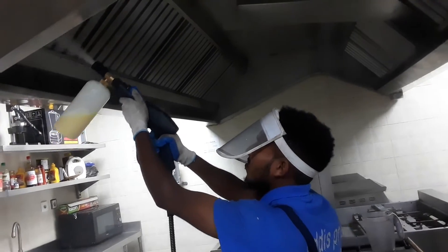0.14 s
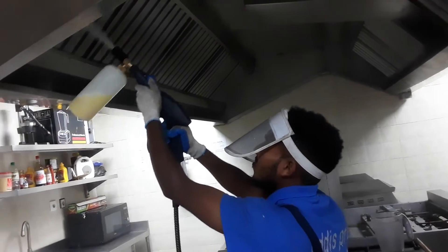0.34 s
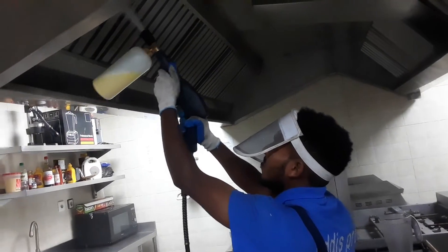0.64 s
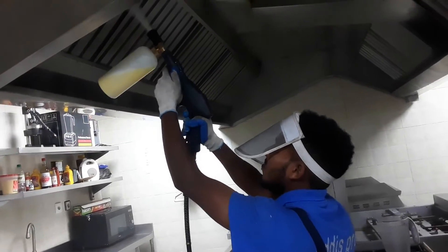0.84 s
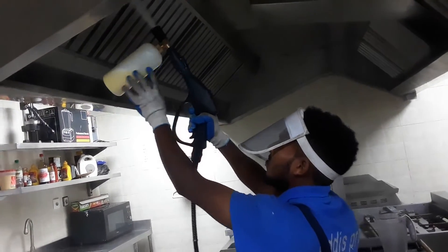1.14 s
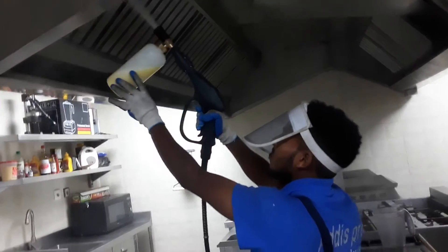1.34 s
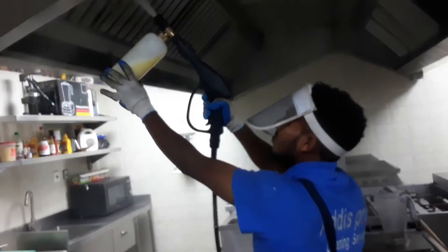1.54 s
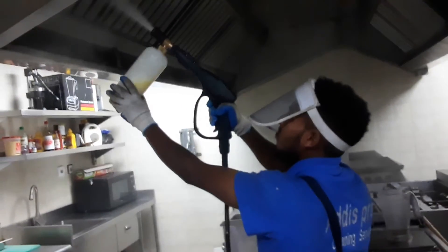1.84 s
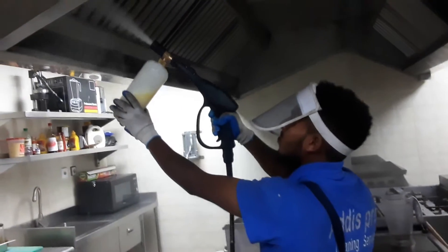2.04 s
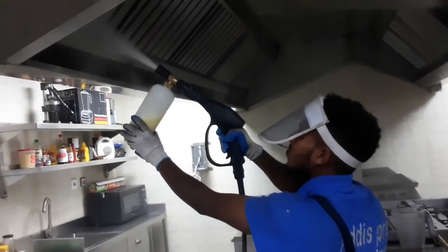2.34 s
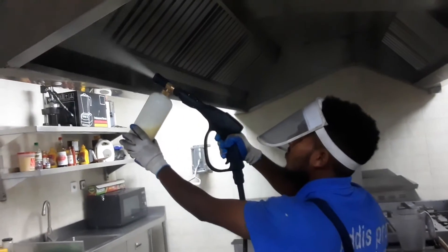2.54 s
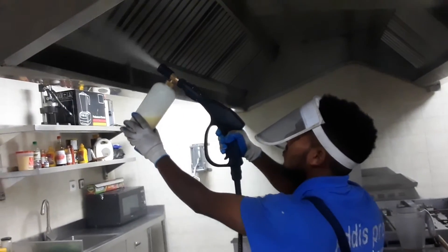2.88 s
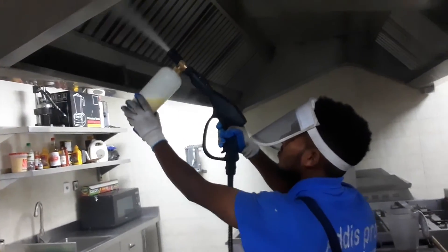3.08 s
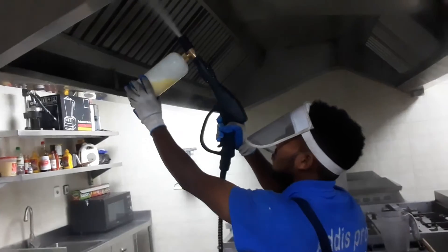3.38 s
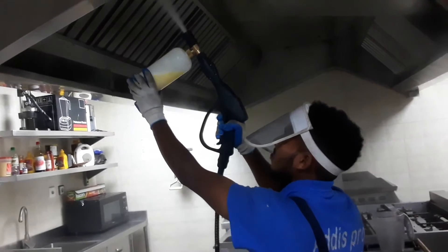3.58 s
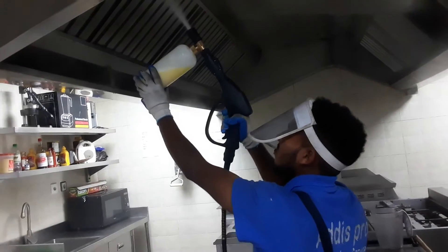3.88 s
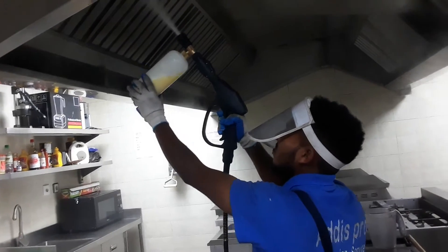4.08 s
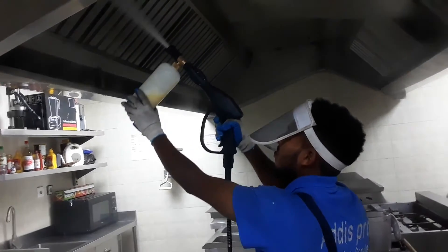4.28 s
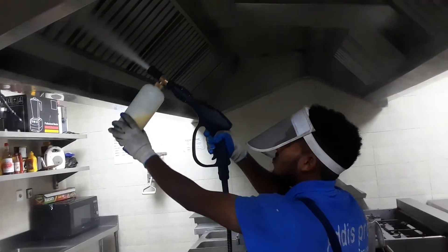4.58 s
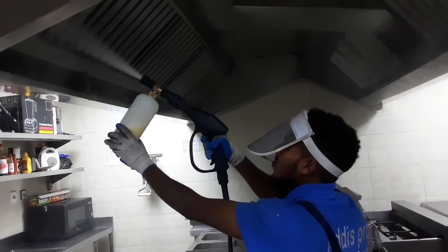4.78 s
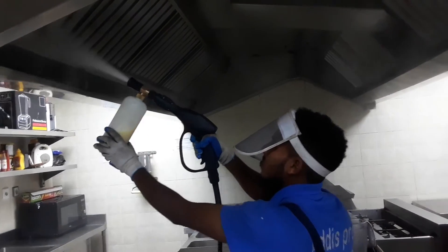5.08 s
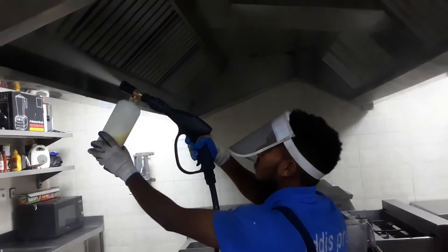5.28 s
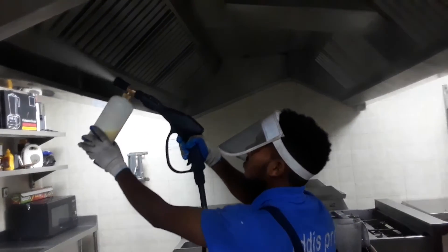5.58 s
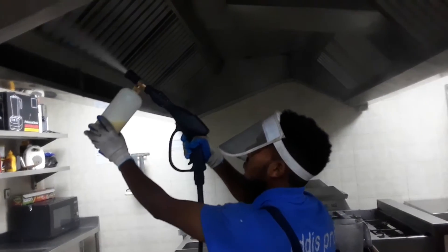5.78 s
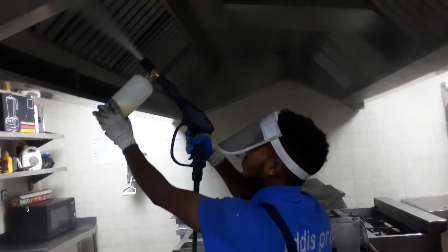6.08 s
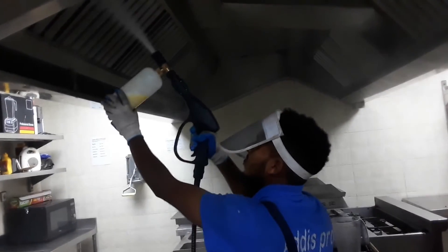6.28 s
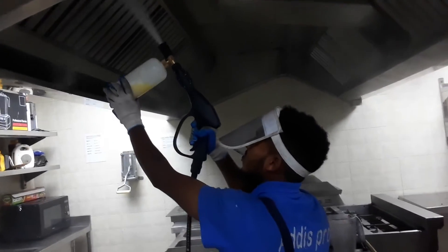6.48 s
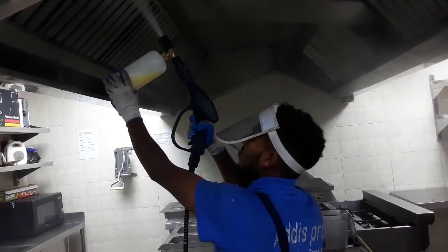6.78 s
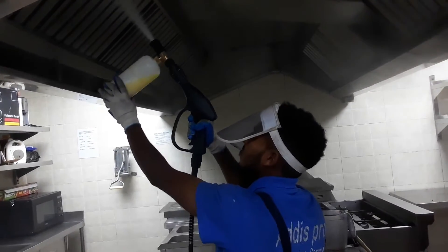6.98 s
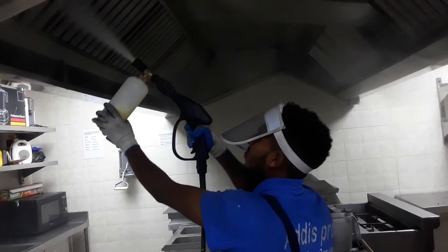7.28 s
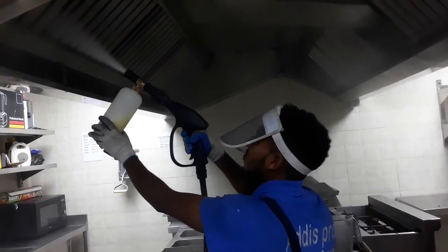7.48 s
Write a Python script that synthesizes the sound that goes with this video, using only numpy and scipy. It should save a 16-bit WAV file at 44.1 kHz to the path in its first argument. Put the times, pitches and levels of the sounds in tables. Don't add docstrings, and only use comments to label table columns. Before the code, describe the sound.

Close, essentially mono pickup of one unbroken steam spray, harsh and airy with a nasal, whistly colour but no clear pitch. Short metallic and tile reflections thicken it. It starts near and full, eases around three to four seconds, swells near five, thins around six, then recovers. Mist pops cluster before three seconds and near the end; fan rumble, a dull far knock and slight thin-steel ticks sit far below.

```python
import sys
import numpy as np
from scipy import signal
from scipy.fft import rfft, irfft, next_fast_len
from scipy.io import wavfile
from scipy.ndimage import uniform_filter1d

SR = 44100
rng = np.random.default_rng(int(sys.argv[2]) if len(sys.argv) > 2 else 0)


def pcm_store(signal):
    levels = np.round(np.clip(np.atleast_2d(signal), -1, 1) * 32767)
    wavfile.write(sys.argv[1], SR, levels.astype(np.int16).T)


def natural_amplitude(level_db):
    exponent = np.asarray(level_db, float) / 20
    return 10 ** exponent


N = 336483

# pitch in Hz, level in dB per Hz.
JET_SPECTRUM = [(310, -105), (520, -35.5), (721, -20), (1060, -24), (1410, -15), (1580, -18.5), (2070, -6),
                (2350, -4), (2750, -5), (3260, -9), (4270, -9.5), (6640, -1.5), (8220, -19.5), (11100, -19),
                (15600, -18)]
# centre in Hz, width in Hz, lift in dB.
PANEL_RESONANCES = [(660, 54, -0.5), (938, 110, 3.5), (1404, 134, 4), (2740, 100, 0.5), (3244, 430, -4.5),
                    (5950, 450, 2.5), (6900, 1200, 2.5), (7730, 280, -4.5)]
RANGE_EDGES_HZ = [1080, 1700, 2450, 3200, 5300, 7700, 12000]
# time in seconds, nearness to the microphone in dB,
# jet laid flat along the slats in dB, drier steam in dB.
GUN_AIM = [(0, 3.5, -2.3, .5), (.5, 2.7, -2.1, -1.4), (1.0, 2.5, -0.4, -.4), (1.4, 1.5, -1, -1.5),
           (1.9, 2.5, -1, 4.2), (2.3, 1.5, 1.5, 1), (2.8, 2, 3, 1), (3.2, -2, 1.5, 1.3),
           (3.7, -4, -0.2, -0.2), (4.1, -5, -1, 1.7), (4.65, -2, 1.5, -2.5), (4.9, 1.5, 0.3, 0),
           (5.5, 2.3, 2.2, -2.5), (5.9, -3.5, -1.3, 1.3), (6.45, -2, 0.2, -3), (6.8, -3, 0.1, -0.5),
           (7.1, -1, 1.4, -3.5), (7.63, 2, 0.5, -2.5)]
# level in dB, then dB of change per dB of nearness,
# of flat aim and of dryness.
JET_RANGES = [
    (-39.5, 0.34, -0.061, 0.17),
    (-33, 0.71, -0.66, .33),
    (-20.5, .04, -0.17, 0.76),
    (-21, .16, -0.077, -0.37),
    (-29, 0.31, 0.16, 0.34),
    (-21, .33, 0.92, 0.21),
    (-31, 0.74, -0.13, -0.07),
    (-29.5, .3, -0.02, -.64),
]
# pitch in Hz, level in dB per Hz.
RUMBLE_SPECTRUM = [(18, -50), (30, -18), (97, -2.5), (204, -1), (453, -2), (509, 1.5), (650, -14),
                   (840, -31), (1430, -120)]
# middle in seconds, low edge in Hz, high edge in Hz, level in dB.
SIDE_FLECKS = [
    (.118, 6800, 8300, -30),
    (.141, 14500, 15750, -40),
    (.164, 6300, 7600, -24),
    (.884, 11700, 13100, -39),
    (1.209, 14500, 15750, -44),
    (2.881, 13100, 14500, -41),
    (2.881, 6900, 8200, -29),
    (3.09, 13100, 14500, -42),
    (3.601, 9000, 10400, -43),
]
# start in seconds, peak in dB, sharpness in Hz.
MIST_PUFFS = [(0.632, -35, 250), (1.026, -34, 250), (2.280, -24.5, 250), (2.305, -34, 350), (2.4, -38, 250),
              (2.477, -35, 300), (2.632, -30, 350), (2.681, -29, 350), (2.781, -21.5, 350),
              (2.819, -32, 350), (2.988, -34, 300), (3.025, -36, 200), (3.061, -32, 250), (4.293, -32, 250),
              (4.322, -34, 250), (4.616, -35, 300), (4.892, -32, 300), (4.969, -28.5, 350),
              (5.169, -28, 300), (5.256, -39, 400), (5.2683, -13.5, 420), (5.446, -36, 400),
              (6.966, -39, 250), (7.328, -33, 200), (7.377, -37, 250), (7.394, -32, 250), (7.445, -28, 250),
              (7.502, -34, 250), (7.525, -29, 220)]
# start in seconds, peak in dB, length in seconds.
KNOCK_CONTACTS = [
    (3.188, -41, 0.033),
    (3.25, -47, 0.092),
]
# pitch in Hz, level in dB, time to fall 60 dB in seconds.
KNOCK_MODES = [(133, -6.5, .3), (200, -5, 0.34), (314, -2, .15), (350, -4, 0.13), (447, -1, .12),
               (610, 0, 0.044)]
# start in seconds, peak in dB, length in seconds.
RATTLE_CONTACTS = [
    (4.765, -41, 0.011),
    (5.405, -41., 0.013),
    (5.43, -35, 0.018),
]
# pitch in Hz, level in dB, time to fall 60 dB in seconds.
PANEL_MODES = [(445, -8, .06), (620, 2, 0.054), (873, 5, .09)]

JET_POSE_S, MIST_POSE_S = 0.3, 0.09
HOOD_T60_S, HOOD_DB = 0.19, -0.5
SLAT_T60_S, SLAT_DB = 0.0092, 0
WANDER_DB, WANDER_PER_S = 0.63, 2.2
RUMBLE_DB, RUMBLE_SHARE = -48.5, 0.2
DENT_S, SPIT_DB = 0.0012, -7
REBOUND_HZ, REBOUND_T60_S, REBOUND_DB = 66, 0.048, 5
MIC_CUT_HZ = 27
CONTROL_SHARE, CONTROL_DB = 0.23, -11


def rms_one(x):
    return x / np.sqrt(np.mean(x ** 2) + 1e-20)


def in_time(rows):
    s, *columns = np.transpose(rows)
    return [np.interp(np.arange(N) / SR, s, column) for column in columns]


def low_part(x, cut_hz):
    return signal.sosfiltfilt(signal.butter(4, cut_hz, fs=SR, output="sos"), x)


def coloured(x, points, lifts=()):
    size = next_fast_len(N)
    hz = np.maximum(np.arange(size // 2 + 1) * SR / size, 1)
    points_hz, points_db = np.transpose(points)
    level_db = np.interp(np.log(hz), np.log(points_hz), points_db)
    for centre_hz, width_hz, lift_db in lifts:
        level_db = level_db + lift_db / (1 + (2 * (hz - centre_hz) / width_hz) ** 2)
    return irfft(rfft(x, size) * natural_amplitude(level_db), size)[:N]


def drift(rate_hz):
    r = np.exp(-80 * np.pi * rate_hz / SR)
    noise = rng.standard_normal(N // 40 + 2002)
    slow = signal.lfilter([1], [1, -2 * r, r * r], noise)[2000:]
    return np.interp(np.arange(N) / 40, np.arange(len(slow)), rms_one(slow))


def hood(x, pose_s):
    length = 8192
    pose = np.arange(N) / SR / pose_s
    age = np.arange(length) / SR
    fall = natural_amplitude(-60 * age / HOOD_T60_S) + natural_amplitude(SLAT_DB - 60 * age / SLAT_T60_S)
    patterns = rng.standard_normal((120, length)) * fall / np.sqrt(np.sum(fall ** 2))
    padded = np.concatenate([rng.standard_normal(length), x])
    out = x.copy()
    for k in range(int(pose[-1]) + 2):
        a, b = np.searchsorted(pose, [k - 1, k + 1])
        echo = signal.fftconvolve(padded[a + 1:b + length], patterns[k % len(patterns)], "valid")
        fade = np.cos(np.pi / 2 * (pose[a:b] - k))
        out[a:b] += natural_amplitude(HOOD_DB) * echo * fade
    return out


def jet():
    near_db, flat_db, dry_db = in_time(GUN_AIM)
    steam = hood(rng.standard_normal(N), JET_POSE_S)
    mist = hood(rng.standard_normal(N), MIST_POSE_S)
    rest = coloured(mist + low_part(steam - mist, 8620), JET_SPECTRUM, PANEL_RESONANCES)
    flutter = drift(25)
    core_db = -0.13 * flutter
    spray_db = 0.63 * flutter + 0.34 * drift(5.3)
    fine_db = 0.56 * flutter + 0.63 * drift(25)
    finest_db = 0.4 * flutter + 1.1 * drift(25)
    flickers = [0.56 * drift(9), 0.7 * drift(11), core_db, core_db, spray_db, spray_db, fine_db, finest_db]
    out = 0
    for cut_hz, row, flicker_db in zip(list(RANGE_EDGES_HZ) + [None], JET_RANGES, flickers):
        mean_db, near, flat, dryness = row
        part = rest if cut_hz is None else low_part(rest, cut_hz)
        rest = rest - part
        part = part / np.sqrt(uniform_filter1d(part ** 2, size=8820) + 1e-20)
        held_db = near * near_db + flat * flat_db + dryness * dry_db
        wander_db = WANDER_DB * drift(WANDER_PER_S)
        out = out + part * natural_amplitude(mean_db + held_db + wander_db + flicker_db)
    return out


def rumble():
    near_db = in_time(GUN_AIM)[0]
    air = rms_one(coloured(rng.standard_normal(N), RUMBLE_SPECTRUM))
    return air * natural_amplitude(RUMBLE_DB + RUMBLE_SHARE * near_db + 1.3 * drift(12))


def side_flecks():
    out = np.zeros(N)
    swell = np.sin(np.pi * np.arange(2048) / 2048) ** 2
    for s, low_hz, high_hz, side_db in SIDE_FLECKS:
        band = signal.butter(6, [low_hz, high_hz], "band", fs=SR, output="sos")
        fleck = signal.sosfiltfilt(band, rng.standard_normal(2048))
        at = round(s * SR) - 1024
        out[at:at + 2048] += natural_amplitude(side_db) * rms_one(fleck) * swell
    return out * [[1], [-1]]


def puffs():
    out, t = np.zeros(N), np.arange(4000) / SR
    late = t - DENT_S
    rebound = natural_amplitude(REBOUND_DB - 60 * late / REBOUND_T60_S) * np.cos(2 * np.pi * REBOUND_HZ * late)
    shape = np.where(late < 0, -1.8, rebound)
    bright = signal.butter(4, 9000, "high", fs=SR, output="sos")
    for s, peak_db, sharp_hz in MIST_PUFFS:
        push = signal.sosfilt(signal.butter(2, 1.5 * sharp_hz, fs=SR, output="sos"), shape)
        droplets = signal.sosfilt(bright, rng.standard_normal(4000))
        push += natural_amplitude(SPIT_DB - 60 * t / 0.012) * droplets
        at = round(s * SR)
        out[at:at + len(push)] += natural_amplitude(peak_db - 6.5) * push[:N - at]
    return out


def ring(push, hz, t60_s):
    r, w = natural_amplitude(-60 / (t60_s * SR)), 2 * np.pi * hz / SR
    return signal.lfilter([0, np.sin(w)], [1, -2 * r * np.cos(w), r * r], push + 1e-18)


def dragging_contacts(contacts, modes):
    t, drag = np.arange(N) / SR, np.zeros(N)
    for s, peak_db, length_s in contacts:
        touching = (t > s) * (t < s + 2 * length_s)
        drag += natural_amplitude(peak_db - 6 * np.maximum(t - s, 0) / length_s) * touching
    out = np.zeros(N)
    for hz, level_db, t60_s in modes:
        out += natural_amplitude(level_db - 21.5) * ring(drag * rng.standard_normal(N), hz, t60_s)
    return out


def knock():
    return dragging_contacts(KNOCK_CONTACTS, KNOCK_MODES)


def rattle():
    return dragging_contacts(RATTLE_CONTACTS, PANEL_MODES)


def scene():
    mono = jet() + rumble() + puffs() + knock() + rattle()
    return np.array([mono, mono])


def low_pass(x):
    return signal.sosfilt(signal.butter(12, 15820, fs=SR, output="sos"), x)


def record(dry):
    cut = signal.sosfilt(signal.butter(2, MIC_CUT_HZ, "high", fs=SR, output="sos"), dry)
    level_db = 10 * np.log10(uniform_filter1d(cut ** 2, size=2200, axis=1) + 1e-12)
    evened = cut * natural_amplitude(CONTROL_SHARE * (CONTROL_DB - level_db))
    limited = evened / (1 + evened ** 8) ** (1 / 8)
    top_cut = signal.ellip(12, 0.3, 80, 15730, fs=SR, output="sos")
    mix = signal.sosfiltfilt(top_cut, limited) + side_flecks()
    return low_pass(mix)


dry = scene()
out = record(dry)
pcm_store(out)
```